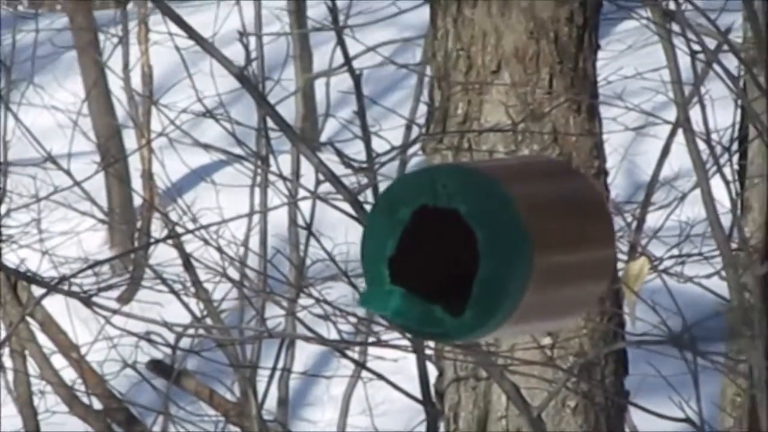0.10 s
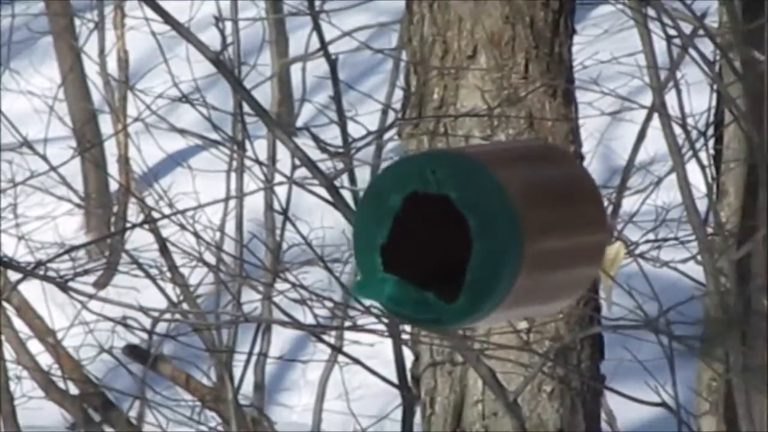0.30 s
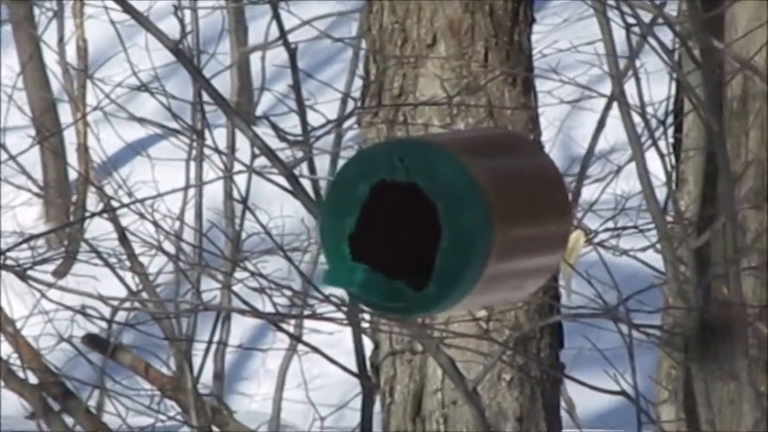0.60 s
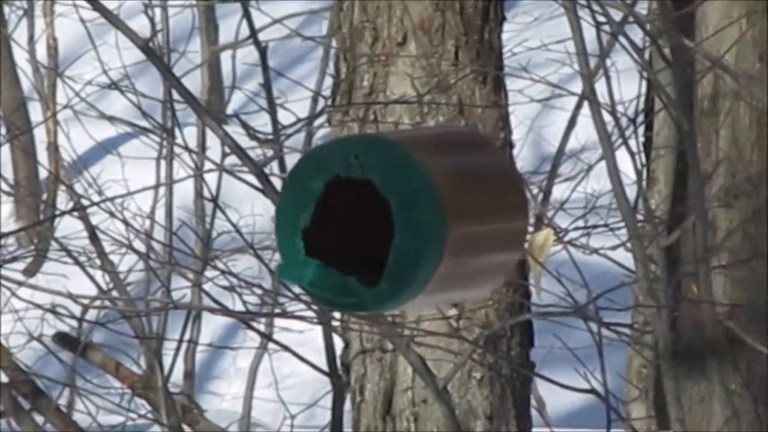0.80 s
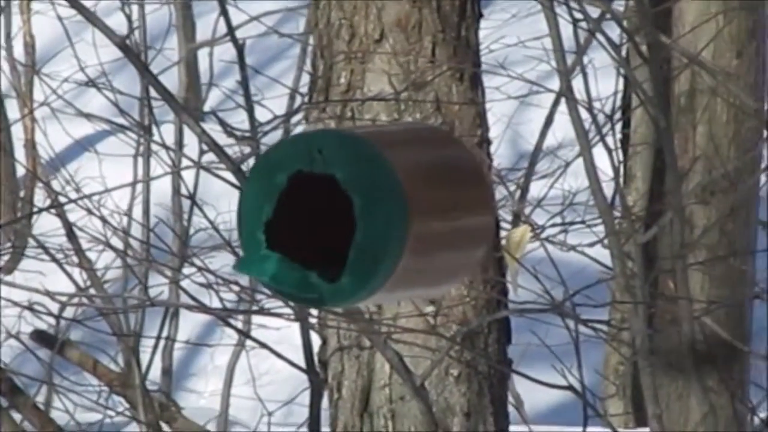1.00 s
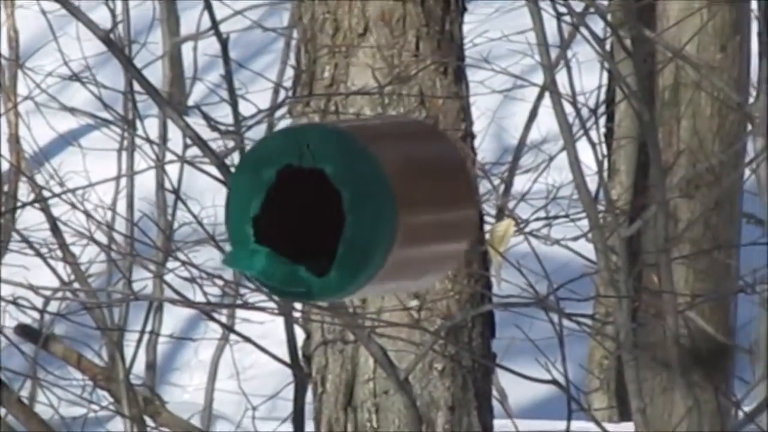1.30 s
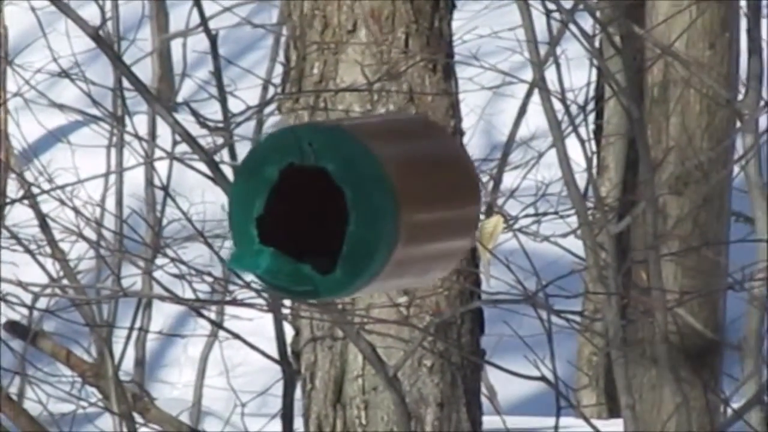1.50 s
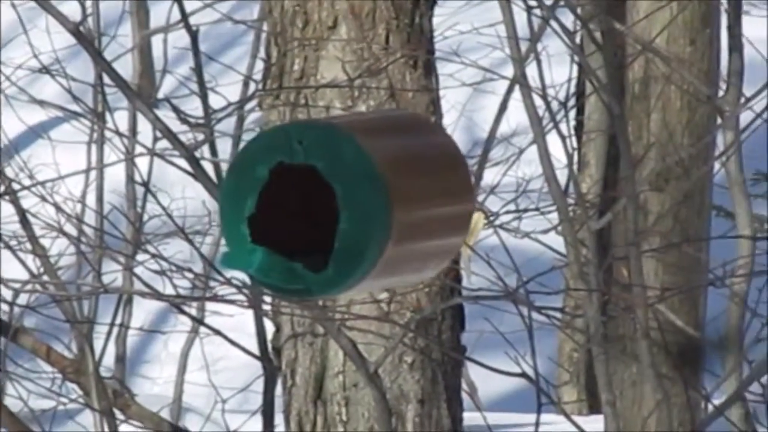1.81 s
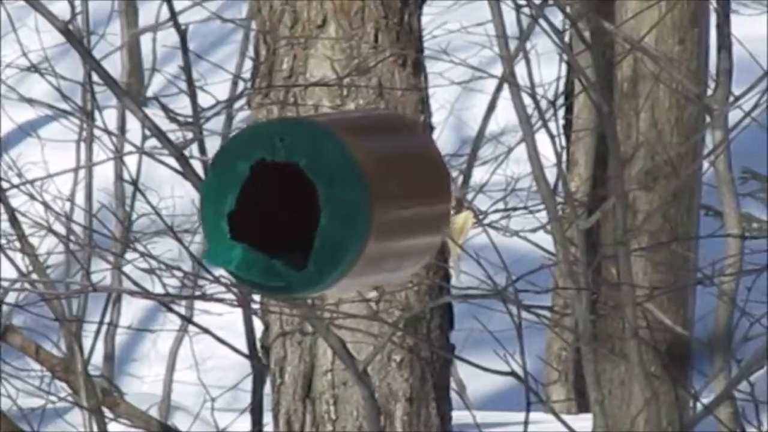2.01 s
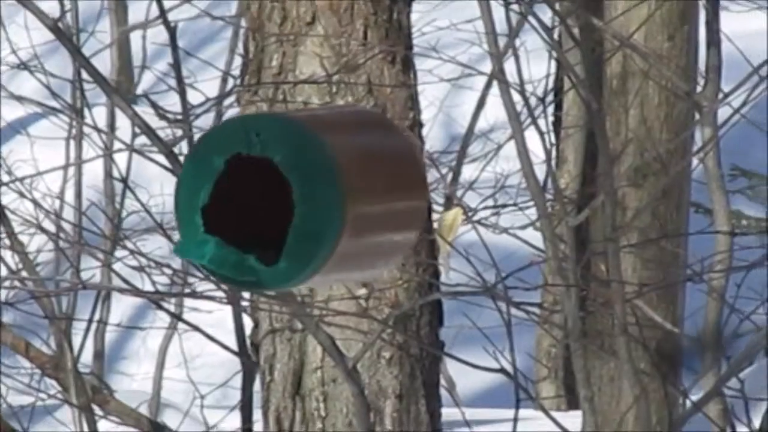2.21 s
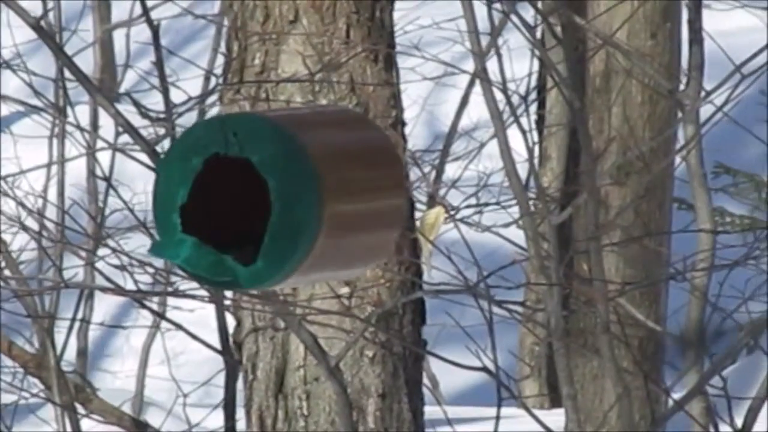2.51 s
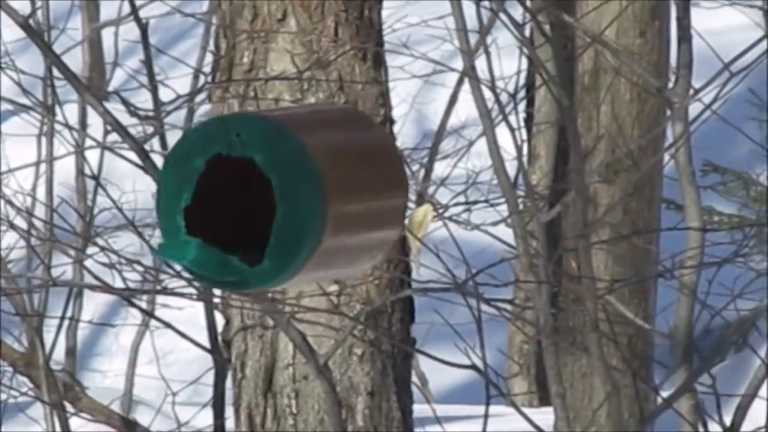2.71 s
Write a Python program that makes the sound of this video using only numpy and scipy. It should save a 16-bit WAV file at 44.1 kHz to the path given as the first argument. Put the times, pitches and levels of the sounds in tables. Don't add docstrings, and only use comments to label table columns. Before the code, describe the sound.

Small songbird's raspy dee-dee-dee calls ring out over faint low rumble and thin hiss.

```python
import sys
import numpy as np
from scipy import signal
from scipy.fft import rfft, irfft, next_fast_len
from scipy.io import wavfile
from scipy.ndimage import uniform_filter1d, minimum_filter1d

SR = 44100
rng = np.random.default_rng(int(sys.argv[2]) if len(sys.argv) > 2 else 0)


def makeup_ratio(level_db):
    decades = np.asarray(level_db, float) / 20
    return 10 ** decades


def log_audio(samples):
    frames = np.atleast_2d(samples).T
    limited = np.clip(frames, -1, 1)
    pcm = np.round(limited * 32767).astype(np.int16)
    wavfile.write(sys.argv[1], SR, pcm)


N = 127890


def walk(rate_hz, size):
    hold = max(int(SR / rate_hz), 2)
    draws = rng.standard_normal(size)[:size // hold + 1]
    steps = np.repeat(draws, hold)
    return 1.35 * uniform_filter1d(uniform_filter1d(steps, hold), hold)[:size]


def bell(x, centre, width):
    return np.exp(-.5 * ((x - centre) / width) ** 2)


def peaks(table, hz):
    power = sum(makeup_ratio(2 * db) * bell(hz, f, width) for f, width, db in table)
    return np.sqrt(power + 1e-9)


def colour(x, gain):
    size = next_fast_len(x.shape[-1])
    hz = np.arange(size // 2 + 1) * SR / size + 1
    return irfft(rfft(x, size) * gain(hz), size)[..., :x.shape[-1]]


def level(x, db):
    return x * makeup_ratio(db) / np.sqrt(np.mean(x ** 2))


# (frequency [Hz], level [dB per Hz])
WOODS = [(20, -14), (90, -9), (300, -11), (800, -14), (1500, -24), (3000, -33), (8000, -40.5),
         (15000, -50.5)]
# (time [s], length [s], level [dB])
PUFFS = [(0.255, 0.037, 5.5), (0.4, 0.045, 8), (0.554, 0.03, 4.5), (0.708, 0.015, 14), (0.786, 0.033, 10),
         (1.01, 0.026, 13), (1.12, .02, 14), (1.413, 0.049, 13.5), (1.614, .02, 4), (1.953, 0.017, 8.5),
         (2.243, .025, 13), (2.392, 0.056, 6.5), (2.533, 0.011, 11), (2.62, 0.052, 9.5),
         (2.801, .035, 11.5)]


def woods():
    t = np.arange(N) / SR
    mid, side = rng.standard_normal((2, N))
    side = colour(side, lambda hz: .4 / (1 + (6000 / hz) ** 2) + .012 + .04 / (1 + (hz / 250) ** 4))
    woods_hz, woods_db = np.array(WOODS).T
    pair = colour(np.array([mid + side, mid - side]),
                  lambda hz: makeup_ratio(np.interp(np.log(hz), np.log(woods_hz), woods_db)))
    gust_db = .5 * walk(3.1, size=N)
    puffs_db = sum(db * bell(t, start_s, long_s) for start_s, long_s, db in PUFFS)
    rise_db = -11.5 * np.exp(-t / .5)
    air = 0
    for centre in 20 * 2 ** np.arange(0, 10, .5):
        band = colour(pair, lambda hz: np.cos(np.pi / 2 * np.clip(2 * np.log2(hz / centre), -1, 1)) ** 2)
        flicker_db = 0.87 + 3 / (1 + (centre / 250) ** 2)
        bass = 1 / (1 + (centre / 220) ** 2)
        bass_db = bass * puffs_db + bass ** 4 * rise_db
        air = air + band * makeup_ratio(gust_db + bass_db + flicker_db * walk(9.23, size=N))
    return level(air, -46.5) + motor_hum(puffs_db) + far_car(t) + whine(t)


def motor_hum(puffs_db):
    hum_hz, width_hz, patchy_db = 164.9, 12.5, 1.5
    modes = [(hum_hz, width_hz, 0), (2 * hum_hz, width_hz, -7)]
    hum = colour(rng.standard_normal(N), lambda hz: peaks(modes, hz))
    return level(hum * makeup_ratio(puffs_db + patchy_db * walk(12, size=N)), -52.5)


def far_car(t):
    car = level(colour(rng.standard_normal(N), lambda hz: bell(hz, 652, 120)), -51.5)
    return car * bell(t, 2, 0.37)


def whine(t):
    return level(np.sin(2 * np.pi * 11800 * t), -86)


LOW_HZ = 2150


def trunks(x):
    onset_s, end_s, t60_s, edge_t60_s = 0.027, 0.14, 0.21, .21
    t = np.arange(SR // 4) / SR
    shape = np.clip(t / onset_s, 0, 1) * np.exp(-(t / end_s) ** 4)
    noise = rng.standard_normal((2, len(t)))
    lasting = colour(noise, lambda hz: bell(hz, 5900, 800))
    decay = makeup_ratio(-60 * t / t60_s)
    tail = shape * (lasting * decay + (noise - lasting) * makeup_ratio(-60 * t / edge_t60_s))
    mid, side = tail / np.sqrt(np.sum((shape * decay) ** 2))
    side = colour(side, lambda hz: 0.36 / (1 + (4860 / hz) ** 4))
    mid = colour(mid, lambda hz: 1 / (1 + (LOW_HZ / hz) ** 2))
    echoes = np.array([mid + side, mid - side])
    return makeup_ratio(-4) * signal.fftconvolve(x[None], echoes, axes=1)[:, :N]


# (frequency [Hz], width [Hz], level [dB])
RASPER_MODES = [(1890, 223, -14), (3670, 280, -15.5), (4270, 220, -2.5), (4800, 190, -1.5),
                (6000, 220, -10), (6620, 140, -4), (8400, 490, -29.5), (9300, 99, -12.5)]


def rasper():
    start_s, attack_s, fade_s = 2.792, .016, 0.043
    clicks_per_s, spread_db = 2500, 3.0
    t = np.clip(np.arange(N) / SR - start_s, 0, None)
    hit, size, sign = rng.random(N), rng.exponential(size=N), rng.standard_normal(N)
    clicks = (hit < clicks_per_s / SR) * makeup_ratio(spread_db * size) * np.sign(sign)
    ringing = level(colour(clicks, lambda hz: peaks(RASPER_MODES, hz)), -38)
    rasp = ringing * np.clip(t / attack_s, 0, 1) * np.exp(-t / fade_s)
    return rasp + trunks(rasp)


# (frequency [Hz], width [Hz], level [dB])
THROAT = [(1564, 64, -26.5), (1810, 110, -31.5), (2666, 113, -29.5), (3160, 187, -14.5), (3719, 110, -14.5),
          (5244, 145, -10), (5940, 294, -6), (6460, 257, -10.5), (7207, 81, -16), (7816, 87, -26),
          (8540, 150, -28.5), (9400, 550, -35), (10850, 320, -45), (14000, 1200, -61)]


def dee(length_s, top_hz, db, beak_db, dull_db):
    attack_s, release_s = 0.018, 0.031
    size = SR // 4
    t = np.arange(size) / SR
    scoop_hz = 60.56 * np.exp(-t / .055)
    sag_hz = 161 * np.clip(t - .125, 0, None)
    hz = top_hz - scoop_hz - sag_hz
    phase = 2 * np.pi * np.cumsum(hz * (1 + .003 * walk(90, size=size))) / SR
    grid = np.arange(0, SR / 2, 10)
    throat = peaks(THROAT + [(4580, 170, -19 + beak_db)], grid)
    rasp = .36 + .5 * np.exp(-t / .03) + .5 * bell(t, length_s - release_s / 2, release_s)
    treble_db = 9 * np.exp(-t / .035) - dull_db * t
    ridge_db = 10 * (1 - np.exp(-t / .06))
    late_db = -24 * np.exp(-t / 0.028)
    buzz = 0
    for k in range(4, 48):
        overtone_hz = k * top_hz
        turn = phase * k + 2 * np.pi * rng.random()
        tone = (1 + rasp * walk(300, size=size)) * np.sin(turn)
        tone = tone + rasp * walk(300, size=size) * np.cos(turn)
        tone_db = 2.2 * walk(40, size=size)
        tone_db = tone_db + treble_db / (1 + (6700 / overtone_hz) ** 10)
        tone_db = tone_db + ridge_db * bell(k, 18.1, .9)
        tone_db = tone_db + (overtone_hz < LOW_HZ) * late_db
        follow = 0.57 if overtone_hz < 4300 else 0.17
        throat_gain = np.interp(k * hz * (top_hz / hz) ** follow, grid, throat)
        buzz = buzz + throat_gain * makeup_ratio(tone_db) * tone
    swell = (1 - np.exp(-2 * t / attack_s)) * makeup_ratio(-12 * np.exp(-t / 0.018))
    release = np.sin(np.pi / 2 * np.clip((length_s - t) / release_s, 0, 1)) ** 2
    return level(buzz, db) * swell * release


# (time [s], length [s], final buzz rate [Hz], level [dB], extra beak resonance [dB])
DEES = [
    (0.188, 0.19, 312.8, -14, 6.5),
    (0.465, 0.2, 319.1, -14, 3),
    (0.757, 0.19, 323.4, -13, 2),
    (1.101, 0.19, 330, -12, 4),
    (1.383, .17, 335.2, -12, -6.5),
    (1.693, .175, 336.6, -10.5, -1.5),
    (2.014, 0.19, 338.7, -12, -0.5),
    (2.448, .16, 316.4, -14, 10.5),
]
DULLING = [24, 7.1, 5, 6.1, 5, 5, 3.7, 87]
# (frequency [Hz], width [Hz], depth [0-1])
SNOW_DIPS = [(2037, 62.4, 0.42), (4370, 95, 0.09), (8340, 150, .8)]
# (time [s], left minus right level [dB])
HEAD_TURN = [(.2, -2.2), (.9, -2.8), (1.5, -2.2), (2.099, -1.2), (2.3, -.6), (2.45, -3.1)]


def chickadee():
    song = np.zeros(N + SR)
    for (start_s, *settings), dull_db in zip(DEES, DULLING):
        note = dee(*settings, dull_db)
        song[int(start_s * SR):][:len(note)] += note
    song = colour(song[:N], lambda hz: np.prod([1 - min(depth, 1) * bell(hz, f, width)
                                                for f, width, depth in SNOW_DIPS], axis=0))
    heard = song + trunks(song)
    turn_db = np.interp(np.arange(N) / SR, *np.array(HEAD_TURN).T)
    lean = np.tanh(turn_db * np.log(10) / 40)
    side = lean * colour(heard.mean(axis=0), lambda hz: bell(hz, 5700, 980))
    return heard + side * np.array([[1], [-1]])


def scene():
    return woods() + rasper() + chickadee()


def roll_off(x):
    return signal.sosfilt(signal.butter(12, 15610, fs=SR, output="sos"), x)


def record(dry):
    ceiling, span = .93, int(.004 * SR)
    gain = np.minimum(1, ceiling / (np.abs(dry).max(axis=0) + 1e-9))
    gain = uniform_filter1d(minimum_filter1d(gain, 2 * span), span)
    mix = colour(dry * gain, lambda hz: 1 / (1 + (hz / 15200) ** 60))
    return roll_off(mix)


dry = scene()
out = record(dry)
log_audio(out)
```